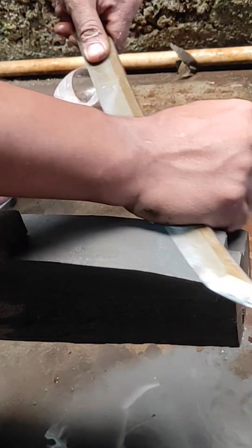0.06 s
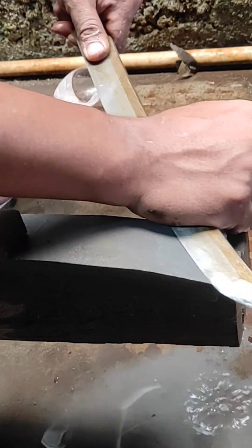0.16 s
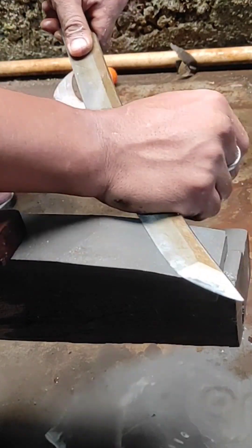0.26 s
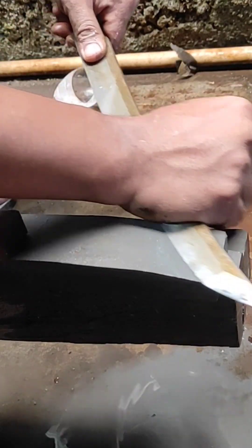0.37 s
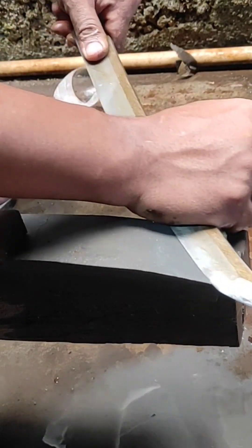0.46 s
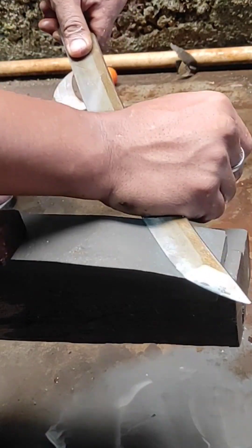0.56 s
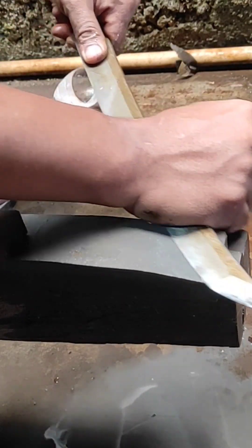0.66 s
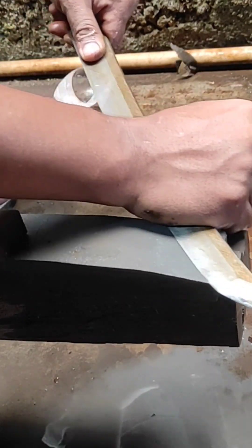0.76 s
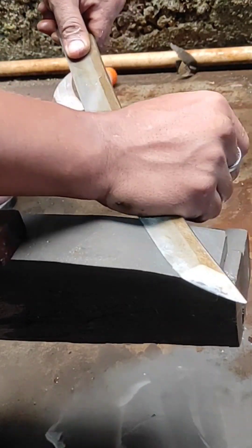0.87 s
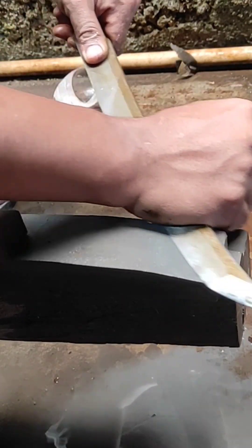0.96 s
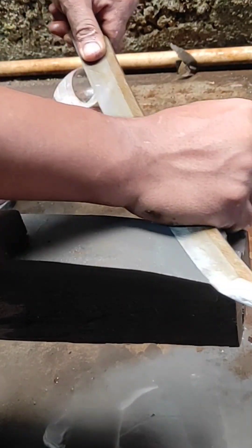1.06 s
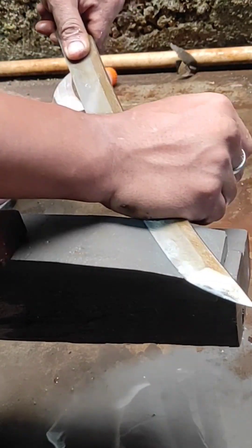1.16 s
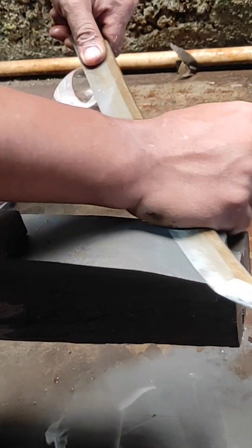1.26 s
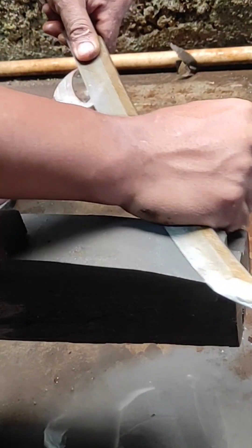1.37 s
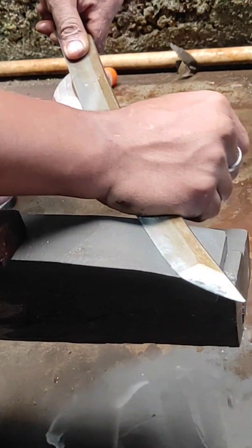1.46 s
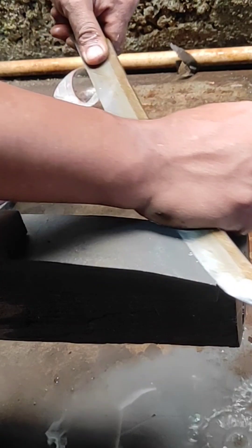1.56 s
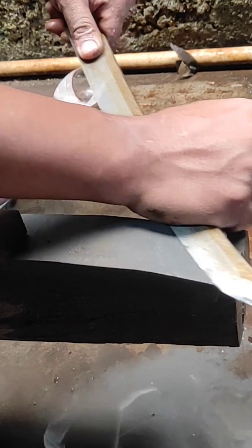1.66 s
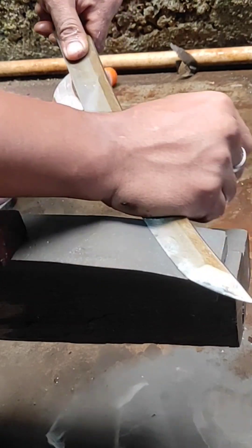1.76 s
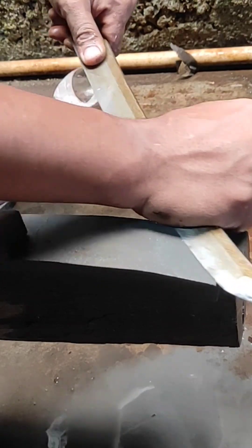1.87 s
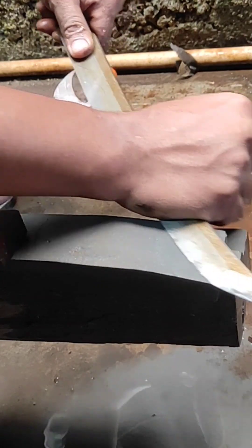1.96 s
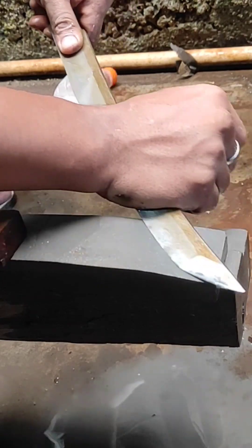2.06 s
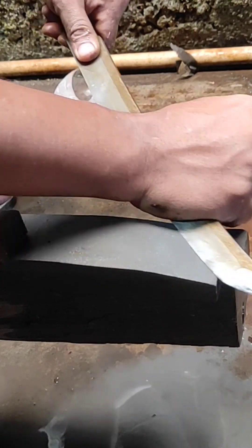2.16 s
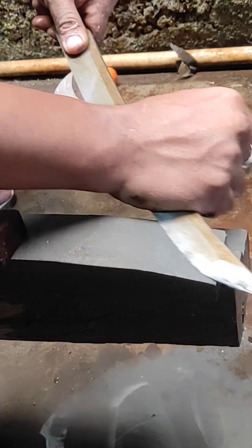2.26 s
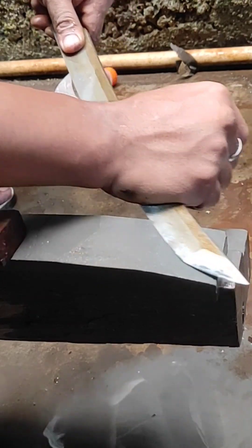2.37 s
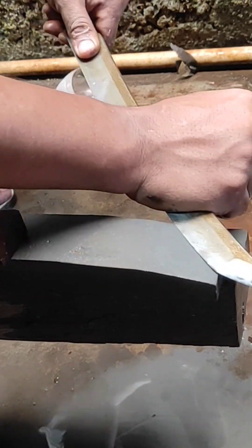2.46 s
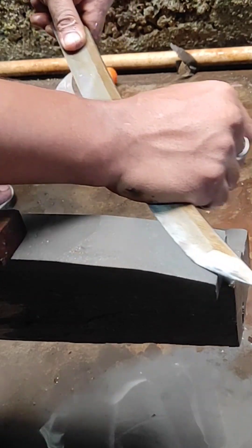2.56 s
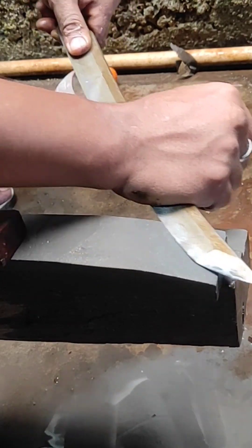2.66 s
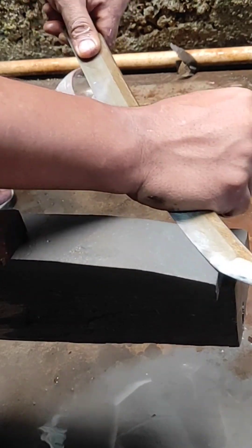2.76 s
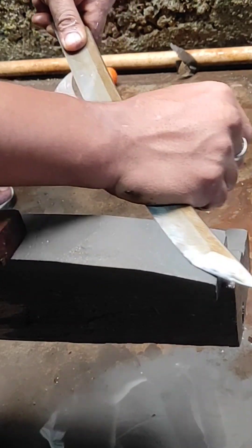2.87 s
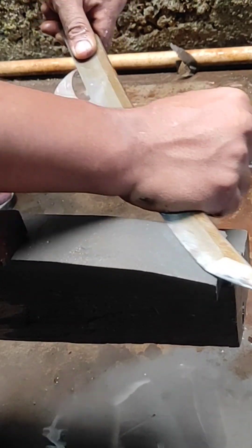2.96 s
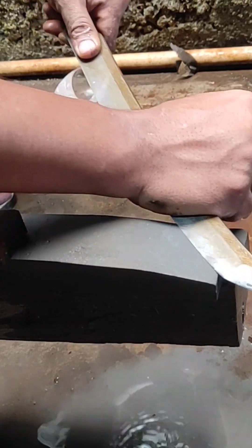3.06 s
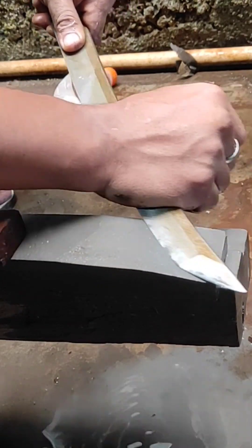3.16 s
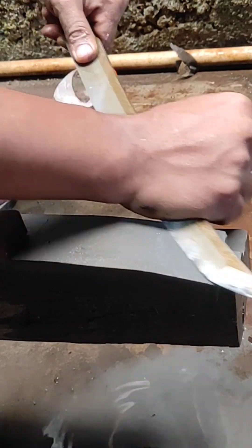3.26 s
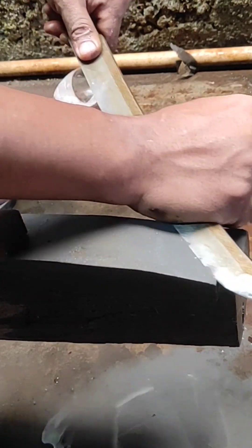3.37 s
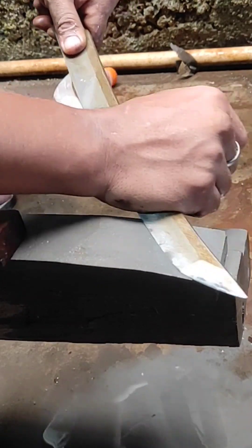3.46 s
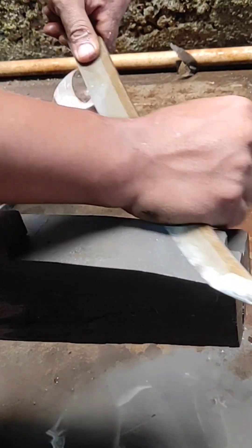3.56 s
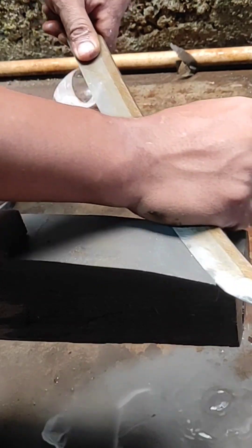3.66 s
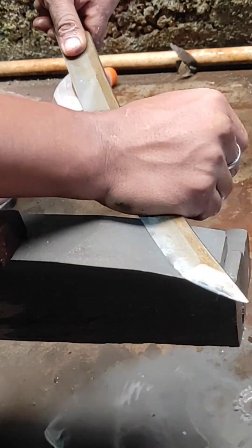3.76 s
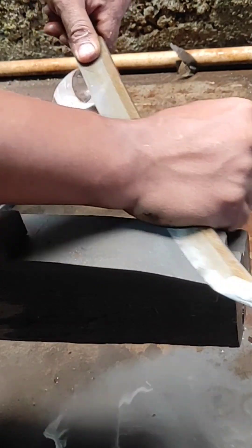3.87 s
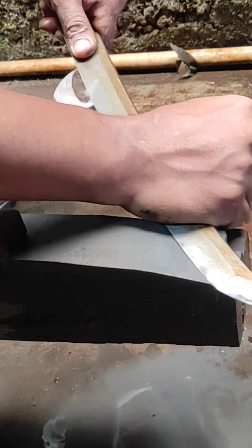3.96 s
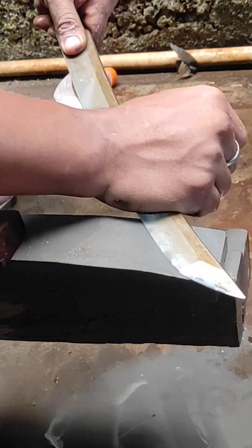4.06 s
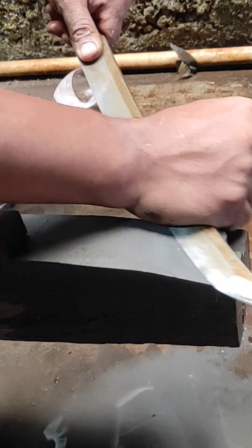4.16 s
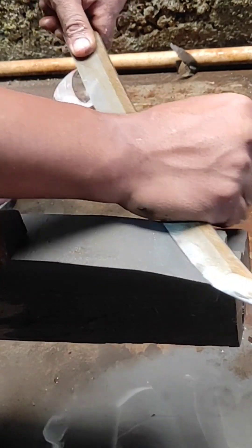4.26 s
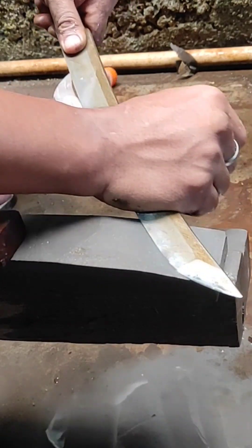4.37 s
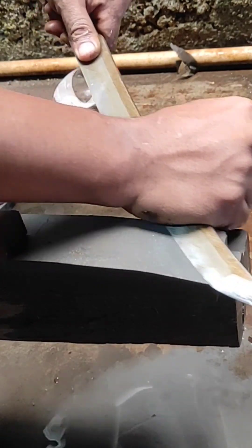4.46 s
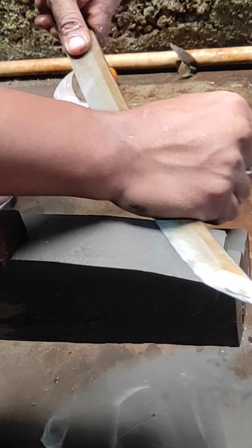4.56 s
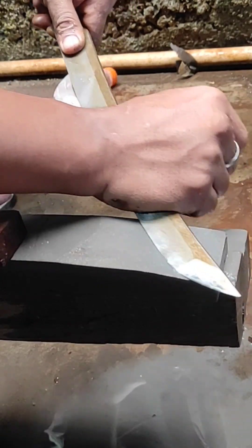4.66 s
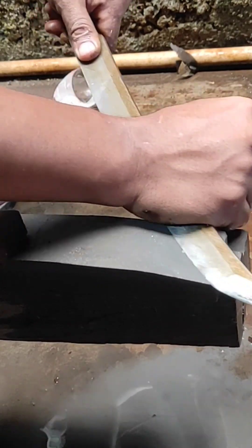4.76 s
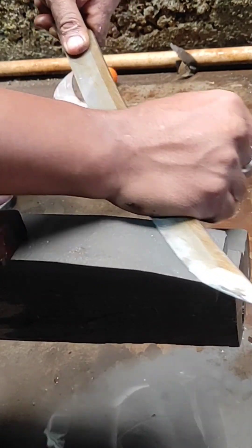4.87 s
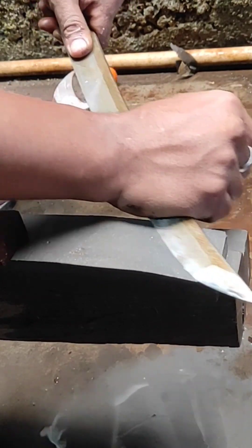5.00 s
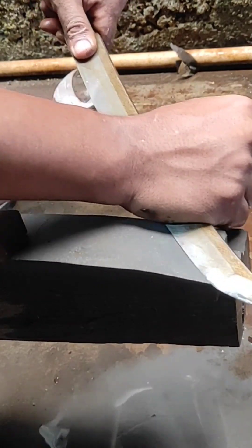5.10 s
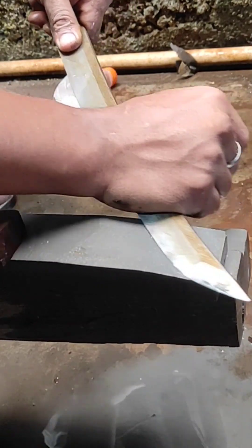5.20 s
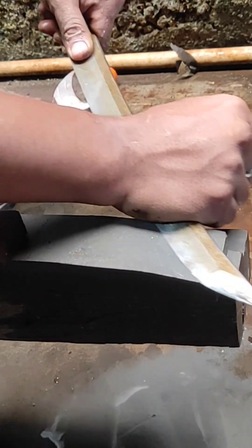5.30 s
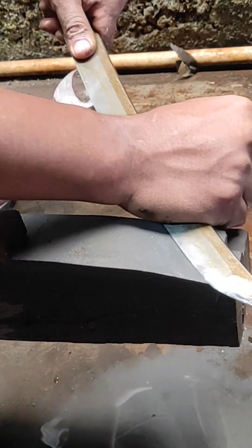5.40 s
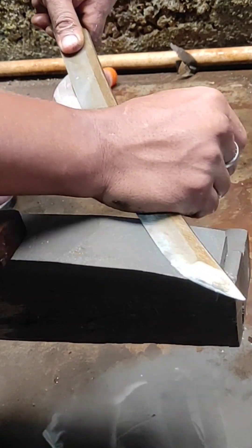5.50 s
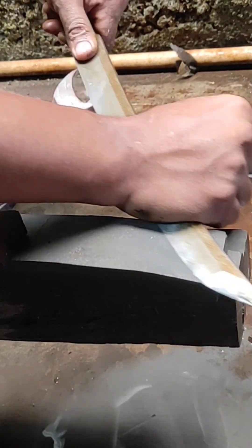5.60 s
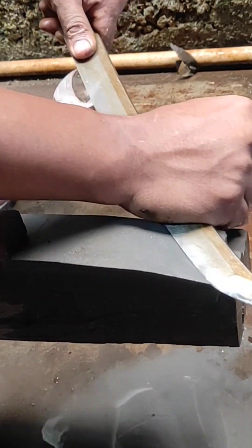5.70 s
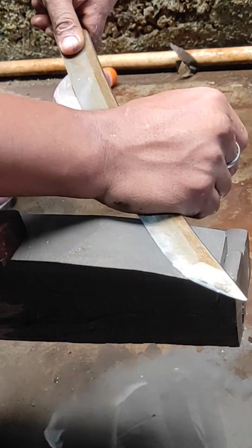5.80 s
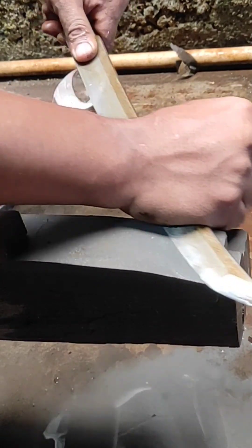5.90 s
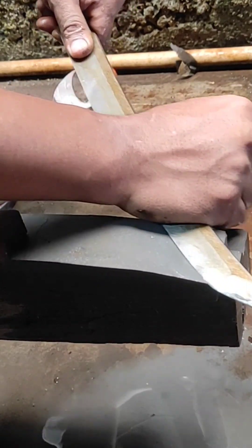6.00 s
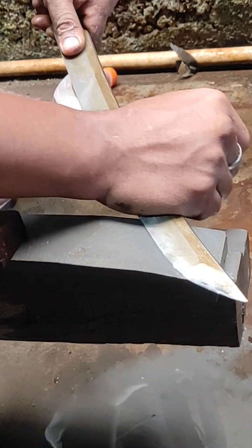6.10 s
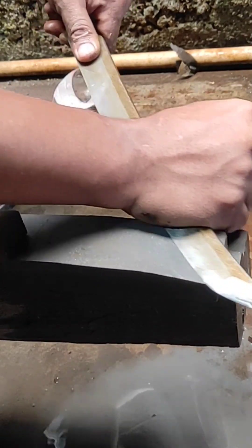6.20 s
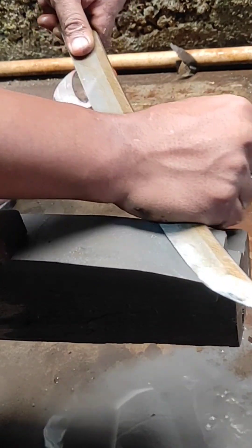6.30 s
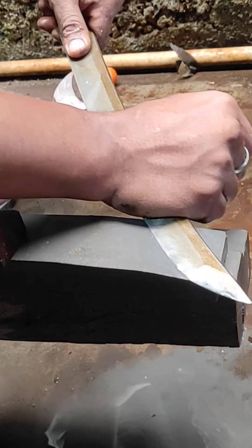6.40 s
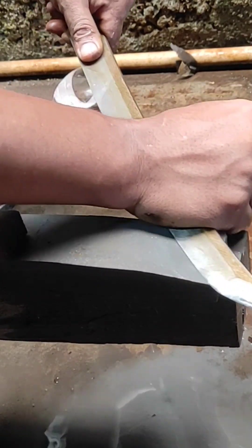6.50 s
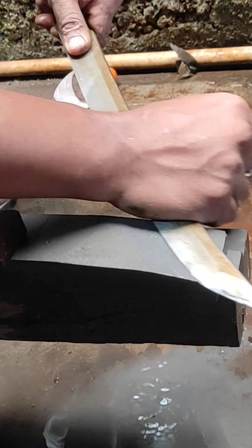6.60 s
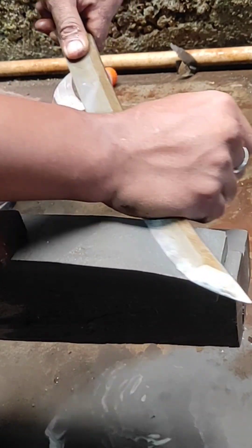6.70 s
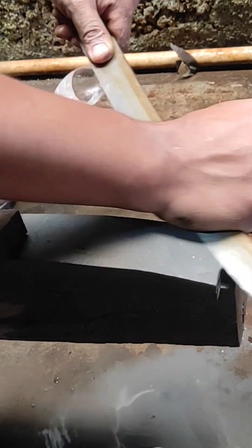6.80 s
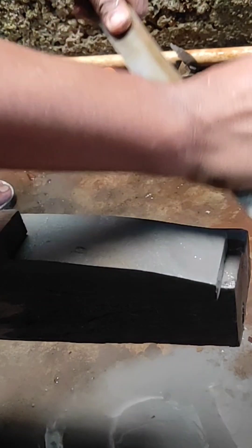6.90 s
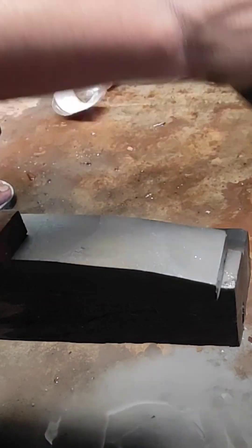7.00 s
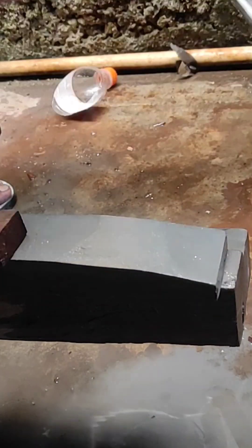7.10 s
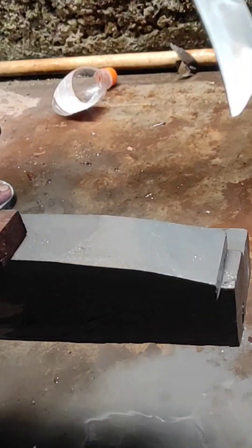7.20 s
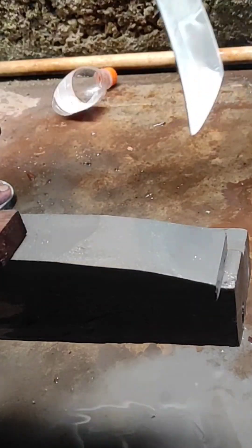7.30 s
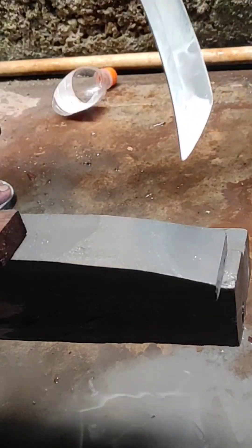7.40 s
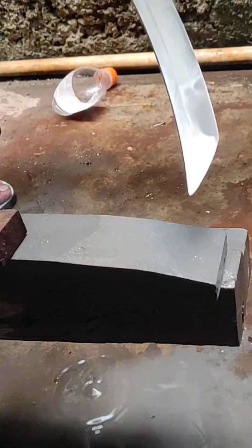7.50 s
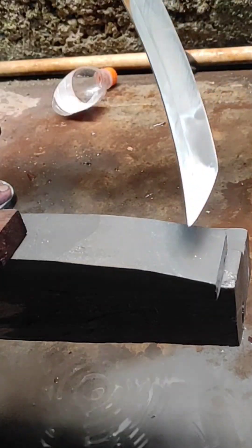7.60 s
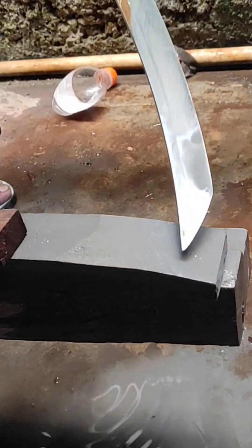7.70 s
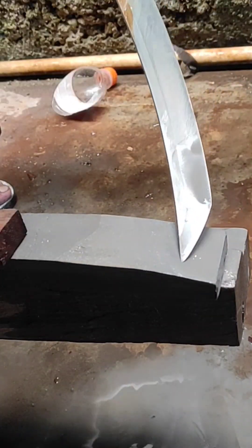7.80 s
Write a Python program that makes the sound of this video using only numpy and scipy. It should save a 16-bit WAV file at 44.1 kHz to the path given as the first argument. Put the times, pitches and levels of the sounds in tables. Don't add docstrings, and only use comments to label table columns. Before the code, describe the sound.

From 0 to about 6.95 seconds a long steel blade is pushed and pulled over a wet stone, close to a phone in a walled open yard. About 24 cycles pass, roughly one every 0.29 seconds, each a pair of short noisy rasps: a louder, brighter push and a softer, stonier pull, with quick dips at the turns. The tone is dense fine grit, strong and sizzling around 5 to 9 kHz, with a hollow mid-range stone scrape below. Pushes vary slightly in strength; pulls become fainter after about 3.7 seconds. Low traffic rumble, roar and engine drones lie far behind, a little fuller around 3 to 4 seconds. At 7 seconds the scraping stops, exposing the quiet road. A very faint airy swish passes at 7.53, and at 7.82 the tip touches, skids and bounces in one tiny, dry metallic clink with a short ring.

```python
import sys
import numpy as np
from scipy import signal
from scipy.fft import rfft, irfft, next_fast_len
from scipy.io import wavfile
from scipy.ndimage import uniform_filter1d, map_coordinates

SR = 44100
rng = np.random.default_rng(int(sys.argv[2]) if len(sys.argv) > 2 else 0)


def dump_mix(stems):
    frames = np.atleast_2d(stems).T
    limited = np.clip(frames, -1, 1)
    pcm = np.round(limited * 32767).astype(np.int16)
    wavfile.write(sys.argv[1], SR, pcm)


def ratio(d):
    e = np.asarray(d, float) / 20
    return 10 ** e


N = 346185

# turn_s, full_speed_level_db, full_speed_reached (share of stroke)
PUSHES = [(0.066, -26.5, 0.29), (0.369, -27.5, 0.22), (0.654, -28, 0.26), (0.958, -24.5, 0.41),
          (1.247, -26, 0.39), (1.539, -24, 0.28), (1.844, -26, 0.29), (2.135, -23.6, 0.25),
          (2.417, -27, 0.17), (2.69, -29.5, 0.23), (2.972, -27.5, 0.18), (3.261, -25.5, 0.4),
          (3.562, -26, 0.28), (3.843, -25.5, 0.32), (4.142, -26, 0.28), (4.435, -26, 0.28),
          (4.72, -27, 0.27), (5.006, -27, 0.27), (5.3, -27.5, 0.26), (5.592, -26, 0.36), (5.88, -28, 0.21),
          (6.166, -28.5, 0.22), (6.455, -27.8, 0.36), (6.743, -23, 0.3)]
# turn_s, full_speed_level_db, full_speed_reached (share of stroke)
PULLS = [(-0.08, -30, .4), (0.22, -28.5, 0.52), (0.521, -31.5, 0.16), (0.811, -30.5, 0.29),
         (1.109, -33.5, 0.12), (1.401, -30.5, 0.97), (1.696, -30.5, 0.14), (1.982, -29, 0.17),
         (2.276, -28, 0.27), (2.558, -29, 0.38), (2.848, -29, 0.37), (3.126, -30, .24), (3.416, -30, 0.1),
         (3.718, -34.5, 0.15), (3.999, -35, .11), (4.298, -34, 0.84), (4.584, -34, 0.5),
         (4.873, -35.5, 0.2), (5.164, -35, 0.47), (5.451, -34.5, 0.33), (5.745, -35, 0.24),
         (6.031, -32.5, 0.36), (6.344, -36.5, 0), (6.603, -34.5, 0.35)]
# centre_hz, width_hz, level_db, left_right_db, likeness (0-1), phase_lead_rad
BLADE_MODES = [(3850, 400, -4, 0, .7, -2.2), (4650, 300, -2, 0, .7, 2), (5620, 400, 0, 0, .7, 2.5),
               (6400, 350, 0, -2, .7, 2.5), (6850, 400, -4, -2, .7, 1.3), (7450, 500, 0, 0, .7, 1.5),
               (7900, 400, -3, 0, .7, .8), (8380, 400, 0, 0, .7, 1), (9430, 220, 4, 0, .8, 3),
               (10520, 300, 5, 0, .7, 3), (11600, 400, 1, 0, .8, 1), (12000, 350, 1, 0, .85, 0),
               (12850, 500, 1, 0, .8, 2.3), (13850, 600, 0, 0, .8, .4), (14850, 600, -3, 0, .8, .2)]
# centre_hz, width_hz, level_db, left_right_db, likeness (0-1), phase_lead_rad
STONE_MODES = [(445, 410, 4.7, -1.1, 0.88, 0.5), (743, 150, 1.3, -2.6, 1, 1.5),
               (1048, 404, 4.2, 0.85, 0.27, 0.6), (1695, 460, 4.2, 0.75, 1, 0.68),
               (2270, 206, 4.1, 1, 1, 1), (2763, 260, 2.7, 0.79, 1, 2), (3420, 850, 0.33, -0.38, 0.91, 5)]
# centre_hz, width_hz
SHALLOW_DIPS = [(10140, 350), (11150, 250), (12390, 300), (13420, 250), (14460, 200)]
# pitch_hz, level_db, t60_s, left_right_db
FREE_MODES = [(321, -10.5, 0.17, 0), (830, -20, .1, 5), (1120, -12, 0.032, -0.5), (1540, -16, 0.035, 0),
              (2430, -24, .1, 3), (3192, -19, 0.19, -6), (4010, -19, 0.074, 2), (4800, -12, 0.03, -13),
              (5600, -15, 0.038, -5), (6440, -18, .1, -6), (7300, -21, .1, -2), (7530, -7.5, 0.064, -5),
              (7760, -7, 0.097, 0), (9700, -3, .06, -3), (10610, -15, .1, 0), (11400, -31, .1, 0),
              (12900, -14, .1, 0), (14100, -12, .1, -2.5)]
# start_s, level_db, low_modes_db, scratch_db
TAPS = [
    (7.8225, -28, 1, -27),
    (7.8281, -25.5, -6, -36),
    (7.8334, -27.5, 5, -32),
]
# centre_s, level_db, centre_hz, half_length_s
SWISHES = [
    (7.53, -64.5, 7000, .03),
]
# time_s, density_db
ROAD_DENSITY = [(0.0, -50), (0.06, -42), (1.18, -43), (1.33, -43), (1.57, -47), (1.66, -44), (2.64, -45.5),
                (3.06, -39), (3.59, -41.5), (3.69, -36.5), (3.85, -40), (6.89, -46.5), (7.7, -49.5),
                (7.85, -45.5)]
# centre_s, level_db, half_length_s
AXLES = [
    (3.37, -41, 0.044),
    (3.54, -42, .08),
    (3.7, -40.5, 0.096),
]
# frequency_hz, level_db (per Hz)
RUMBLE_SPECTRUM = [(15, -32), (30, -0.5), (55, 0), (100, 1), (140, -7.5), (300, -43)]
# frequency_hz, level_db (per Hz)
ROAR_SPECTRUM = [(70, -49), (130, -4), (165, 4), (200, -5), (300, -4), (500, -10.5), (800, -16.5),
                 (1500, -46)]
# frequency_hz, level_db (per Hz)
HISS_SPECTRUM = [(300, -47), (700, 5), (1200, 0), (2200, -4), (4000, -6.5), (9000, -20.5), (15000, -5)]
# [multiple, level_db]
ENGINES = [
    (44.6, -.4, [(.3, -48.5, 1.4), (1.28, -41, 0.16), (1.75, -42.5, 0.21), (2.25, -43, 0.23), (3.15, -39.5, 0.36), (4.4, -50, 0.71), (6.3, -52, 1.9)], [(2, -19), (4, -9.5), (5, -0.5), (6, -9), (8, -22)]),
    (41.6, 0.69, [(.75, -49, 0.39), (2.2, -50.5, 0.29)], [(4, 2), (5, 1), (6, 1)]),
    (46.4, -.4, [(2.32, -47.5, 0.14), (2.65, -39.5, 0.17)], [(2, -3.5), (4, -26)]),
    (24.24, 0.3, [(.4, -60.5, 0.97), (1.5, -61, 0.49)], [(5, 8.5), (6, -20), (7, -4)]),
    (33.15, .01, [(4.1, -52.5, 0.25), (5.0, -49, 0.37), (5.7, -49.5, 0.81)], [(2, -13), (3, 0.5)]),
]
# frequency_hz, gain_db
LEFT_PORT = [(100, 1), (2000, 3.5), (4000, -2), (6900, 4), (7600, 8), (8350, 8.5), (9000, 10), (9500, -1.5),
             (9750, -11), (10500, -8.5), (15000, -23.5)]
# frequency_hz, gain_db
RIGHT_PORT = [(100, -4), (2000, 2.5), (4000, 2.5), (6400, 10), (7400, 15.5), (8100, 12), (9000, -5.5),
              (9500, -1.5), (9750, -11.5), (10500, -5.5), (15000, -17.5)]

PUSH_SLOWS, PULL_SLOWS = 0.7, 0.83
PUSH_TURN_DB, PULL_TURN_DB = -40, -44
HESITATE_DB = 7
STONE_DB, STONE_LAGS = -10.5, 0.23
PULL_STONE_DB = 1.5
LONGEST_S = 0.17
LIFT_S, LIFT_DB, LIFTED_DB = 6.97, -54.5, -58
DRAIN_S = 0.14
YARD_T60_S, YARD_DB = 0.3, -8
RUMBLE_DB, RUMBLE_GROWS = -51, 0.36
ROAR_DB, AXLE_ROAR_DB = -2, -5
HISS_DB, HISS_GROWS = -57.8, 0.4
ROAD_LAG = 5
TOP_HZ = 15420


def unit(x):
    return x / np.sqrt(np.mean(x ** 2) + 1e-20)


def along(points, hz):
    f, v = np.transpose(points)
    return np.interp(np.log(hz + 1), np.log(f + 1), v)


def curves(rows):
    s, *cols = np.transpose(rows)
    return [np.interp(np.arange(N) / SR, s, c) for c in cols]


def wobble(rate):
    return map_coordinates(rng.standard_normal(N // 200), [np.arange(N) * rate / SR], order=2)


def swells(rows):
    t = np.arange(N) / SR
    return sum(ratio(db) * np.exp(-((t - s) / length) ** 2) for s, db, length in rows)


def filtered(x, response):
    m = next_fast_len(N + 8192)
    return irfft(rfft(x, m) * response(np.fft.rfftfreq(m, 1 / SR)), m)[..., :N]


def stereo(pair, alike):
    turn = np.arccos(np.clip(alike, -1, 1)) / 2
    return np.cos(turn) * pair[0] + np.sin(turn) * pair[1] * [[1], [-1]]


def panned(db):
    return db * np.array([[0.5], [-0.5]])


def stroke_levels():
    strokes = []
    for (pull_s, pull_db, pull_rise), (push_s, push_db, push_rise) in zip(PULLS, PUSHES):
        pull_turn_db = PULL_TURN_DB + HESITATE_DB * pull_rise
        strokes.append((pull_s, pull_turn_db, pull_db, pull_rise, max(pull_rise, PULL_SLOWS)))
        strokes.append((push_s, PUSH_TURN_DB, push_db, push_rise, PUSH_SLOWS))
    start, turn_db, full_db, rise, slow = np.transpose(strokes)
    length = np.minimum(np.diff(np.append(start, LIFT_S)), LONGEST_S)
    times = np.transpose([start, start + rise * length, start + slow * length]).ravel()
    levels = np.transpose([turn_db, full_db, full_db]).ravel()
    pulling = np.resize([1, 0], len(start))
    stone_db = STONE_DB + PULL_STONE_DB * pulling - STONE_LAGS * (full_db + 30)
    lift = [(LIFT_S, LIFT_DB, STONE_DB), (LIFT_S + DRAIN_S, LIFTED_DB, STONE_DB)]
    return curves([*zip(times, levels, np.repeat(stone_db, 3)), *lift])


def grit(spread_db, clump_db):
    grain = np.minimum(rng.exponential(size=N), 3)
    clumps = wobble(40) + wobble(150)
    return unit(ratio(spread_db * grain + clump_db * clumps) * rng.standard_normal((2, N)))


def resonate(force, modes, shift_db, wander):
    m = next_fast_len(N)
    spectrum, hz = rfft(force, m), np.fft.rfftfreq(m, 1 / SR)
    for dip_hz, width_hz in SHALLOW_DIPS:
        spectrum = spectrum * (1 - 0.4 / (1 + (2 * (hz - dip_hz) / width_hz) ** 2))
    out = np.zeros((2, N))
    for centre_hz, width_hz, db, pan_db, alike, lead in modes:
        damping = 1j * hz * width_hz
        ring = spectrum * damping / (centre_hz ** 2 - hz ** 2 + damping)
        left, quarter, other = irfft([ring[0], -1j * ring[0], ring[1]], m)[:, :N]
        phase, alike = lead + wander * wobble(7), np.clip(alike, 0, 1)
        shared = np.cos(phase) * left + np.sin(phase) * quarter
        right = alike * shared + np.sqrt(1 - alike ** 2) * other
        level_db = db + shift_db * (wobble(4.04) + wobble(16)) + panned(pan_db)
        out += ratio(level_db) * [left, right]
    return out


def scrape():
    speed_db, stone_db = stroke_levels()
    speed_db = uniform_filter1d(speed_db, size=150)
    force = grit(spread_db=1.5, clump_db=1.3)
    blade = unit(resonate(force, BLADE_MODES, shift_db=0.8, wander=1.3))
    stone = unit(resonate(force, STONE_MODES, shift_db=0.75, wander=0.95))
    return ratio(speed_db - 4.0) * blade + ratio(speed_db + stone_db + 0.9) * stone


def tap():
    out, t = np.zeros((2, N + SR)), np.arange(SR // 10) / SR
    for s, db, low_db, scratch_db in TAPS:
        scratch = np.diff(rng.standard_normal((2, len(t) + 1)))
        sound = ratio(scratch_db - 60 * t / 0.053) * scratch
        for hz, mode_db, t60, pan_db in FREE_MODES:
            level_db = db + mode_db + low_db * (hz < 4200) + rng.normal(0, 2.5) + panned(pan_db)
            phase = rng.uniform(0, 2 * np.pi) * np.array([[0], [1]]) * (hz > 1000)
            sound += ratio(level_db - 60 * t / t60) * np.sin(2 * np.pi * hz * t + phase)
        onset = 1 - np.exp(-t / 0.00072)
        out[:, round(s * SR):][:, :len(t)] += sound * onset
    return out[:, :N]


def swish():
    out = np.zeros((2, N))
    for s, db, centre_hz, length in SWISHES:
        noise = rng.standard_normal((2, N))
        hiss = unit(filtered(noise, lambda hz: 1 / (1 + ((hz - centre_hz) / 2500) ** 2)))
        out += swells([(s, db, length)]) * hiss
    return out


def yard(x):
    t = np.arange(SR // 3) / SR
    tail = rng.standard_normal((2, len(t))) * ratio(-60 * t / YARD_T60_S) * (t > 0.004)
    return signal.fftconvolve(x, tail / np.linalg.norm(tail[0]), axes=1)[:, :N]


def rush(spectrum, alike, lumpy_db, rate):
    noise = filtered(rng.standard_normal((2, N)), lambda hz: ratio(along(spectrum, hz)))
    return unit(stereo(noise, alike) * ratio(lumpy_db * wobble(rate)))


def road():
    density_db, = curves(ROAD_DENSITY)
    axles = swells(AXLES)
    rumble = ratio(RUMBLE_DB + RUMBLE_GROWS * (density_db + 45.5)) + axles
    roar = ratio(density_db + ROAR_DB) + ratio(AXLE_ROAR_DB) * axles
    hiss = ratio(HISS_DB + HISS_GROWS * (density_db + 50))
    out = rumble * rush(RUMBLE_SPECTRUM, 1.0, lumpy_db=-1.5, rate=9)
    out += roar * rush(ROAR_SPECTRUM, 0.84, lumpy_db=0.9, rate=7.6)
    return out + hiss * rush(HISS_SPECTRUM, 0.2, lumpy_db=0.6, rate=6)


def engines():
    out = np.zeros(N)
    for hz, drift, revs, orders in ENGINES:
        turns = np.cumsum(hz + drift * np.arange(N) / SR) / SR + 0.027 * wobble(7)
        drone = np.zeros(N)
        for k, order_db in orders:
            drone += ratio(1.07 + order_db + 2.2 * wobble(10)) * np.sin(2 * np.pi * k * turns)
        out += swells(revs) * drone
    return out


def traffic():
    left, right = road() + engines()
    return np.array([np.roll(left, ROAD_LAG), right])


def scene():
    near = scrape() + tap()
    return near + ratio(YARD_DB) * yard(near) + swish() + traffic()


def band_limit(x):
    return signal.sosfilt(signal.butter(12, 15680, fs=SR, output="sos"), x)


def record(dry):
    ports = lambda hz: ratio([along(LEFT_PORT, hz), along(RIGHT_PORT, hz)]) * (hz < TOP_HZ)
    mix = filtered(dry, ports)
    return band_limit(mix)


dry = scene()
out = record(dry)
dump_mix(out)
```